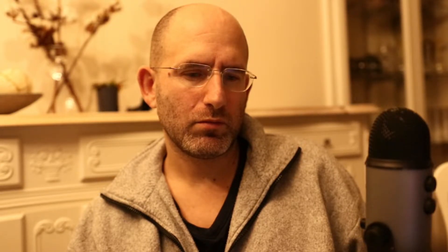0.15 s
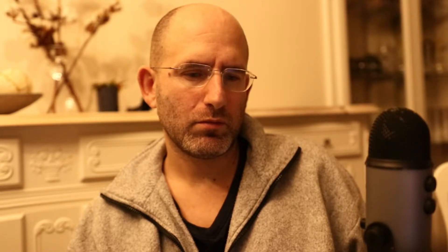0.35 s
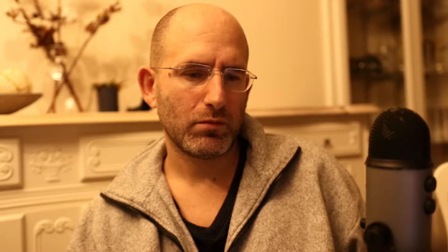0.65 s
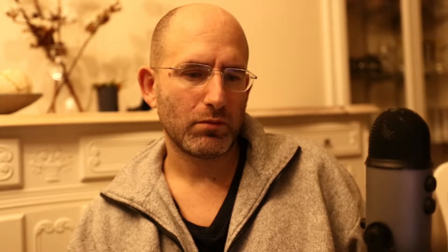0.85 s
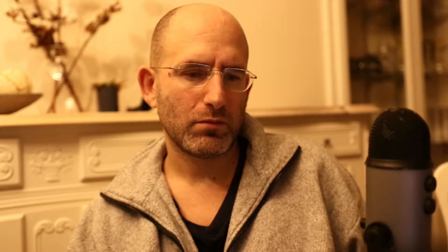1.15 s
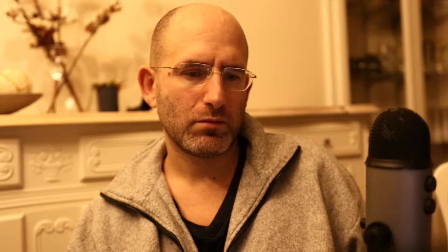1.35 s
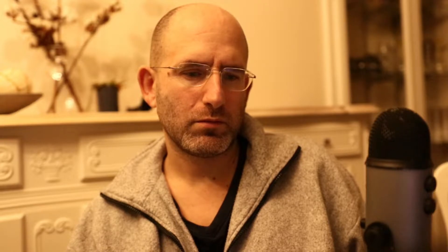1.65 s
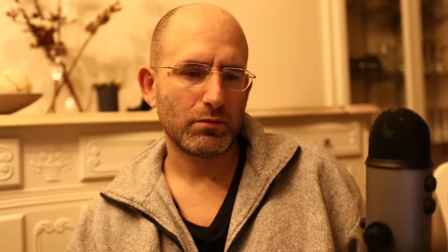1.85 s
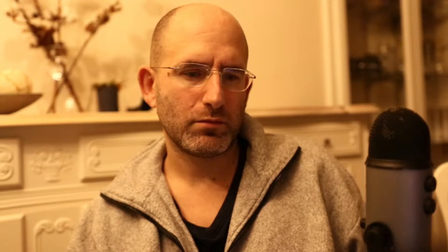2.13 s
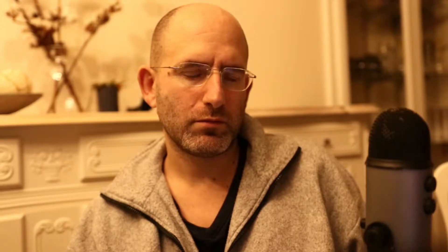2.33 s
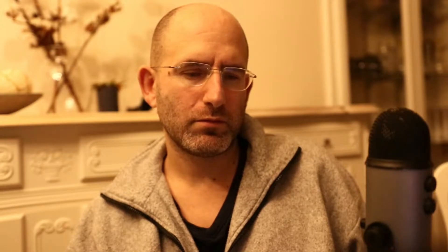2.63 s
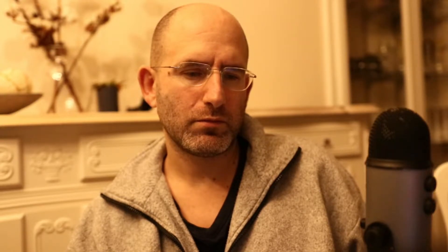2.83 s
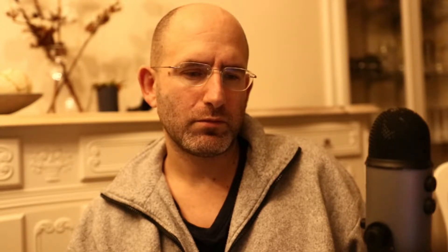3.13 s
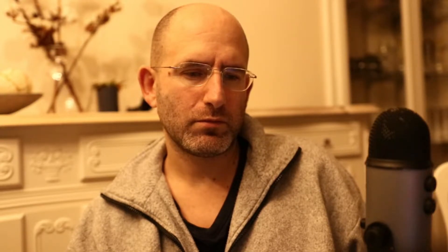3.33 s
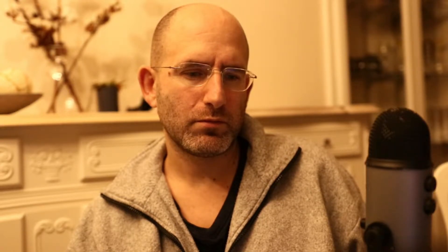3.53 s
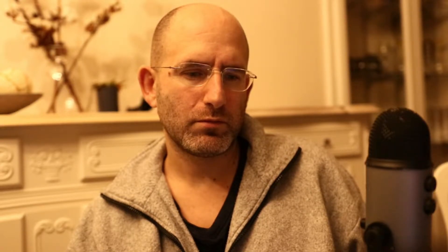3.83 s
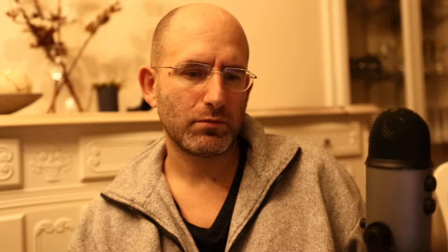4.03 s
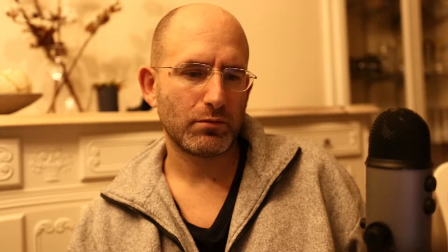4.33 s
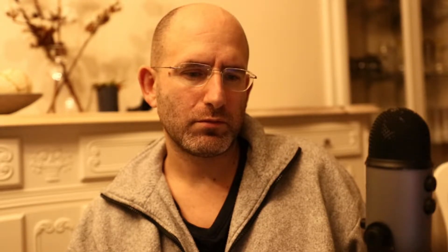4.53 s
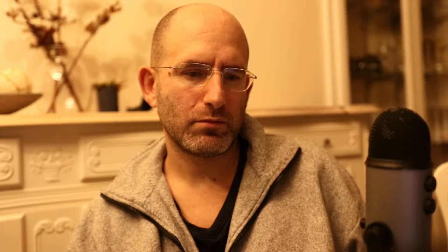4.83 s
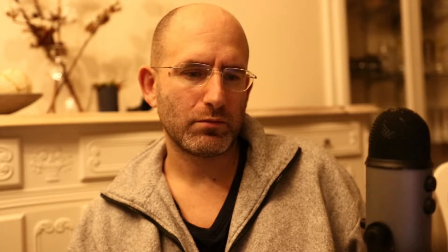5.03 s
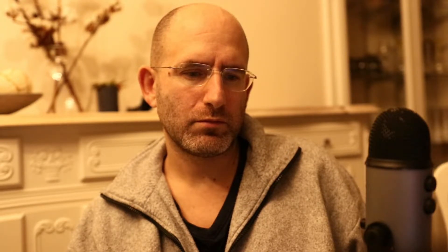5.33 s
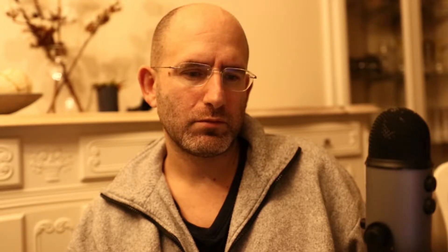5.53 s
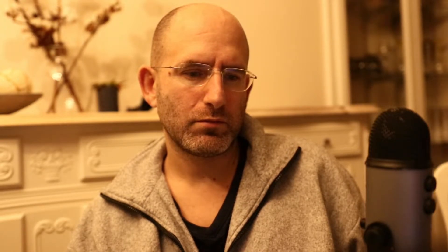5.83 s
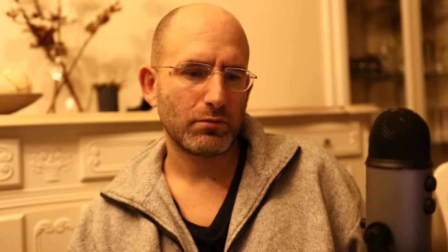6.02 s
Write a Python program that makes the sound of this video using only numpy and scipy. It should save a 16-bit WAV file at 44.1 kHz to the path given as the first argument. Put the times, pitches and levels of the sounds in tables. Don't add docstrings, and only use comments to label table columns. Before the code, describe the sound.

A small motor hums low and steady under soft airy hiss in a quiet furnished room, with one light hollow knock near the start.

```python
import sys
import numpy as np
from scipy import signal
from scipy.fft import rfft, irfft, next_fast_len
from scipy.io import wavfile
from scipy.ndimage import uniform_filter1d

SR = 44100
rng = np.random.default_rng(int(sys.argv[2]) if len(sys.argv) > 2 else 0)


def transcribe(u):
    v = np.clip(np.atleast_2d(u).T, -1, 1)
    q = np.round(v * 32767).astype(np.int16)
    wavfile.write(sys.argv[1], SR, q)


def nominal_scale(level):
    x = np.asarray(level, float) / 20
    return 10 ** x


N = 272273

# f/Hz, level/dB
WHINES = [(4097, -92), (6002, -93), (6449, -94), (6735, -96), (10002, -99)]
# f/Hz, left density/(dB per Hz), right density/(dB per Hz)
RUMBLE = [(12.0, -79, -85), (35.4, -87, -84), (65.0, -82.5, -80.5), (76, -76, -79), (91, -85, -77),
          (137, -83.5, -84.5), (208, -87, -79), (230.8, -72, -85), (238, -64, -84), (269, -81, -89.5),
          (316, -83, -94.5), (355, -85.5, -90.5), (388, -90.5, -88), (500.0, -91.5, -92)]
# f/Hz, share/(0-1), left lead/rad
RUMBLE_PAIR = [(30, 0.77, 1.5), (111, 0.66, 2.47), (173, 0.55, 0.6), (238, 0.82, -1.5), (297, 0.75, 1.6),
               (500, 0.33, -0.75)]
# f/Hz, left density/(dB per Hz), right density/(dB per Hz)
HISS = [(505, -93.5, -94.5), (810, -94, -95.5), (1160, -94.5, -96), (1280, -91.5, -95.5),
        (1800, -94, -93.5), (2120, -96, -99), (2520, -93, -95), (2815, -96, -97.5), (3490, -103.5, -102.5),
        (4030, -101.8, -103.6), (5000, -106.5, -105.6), (7400.0, -107.6, -109.0), (8400, -111.2, -111.3),
        (15100, -114.1, -114.0)]
# f/Hz, share/(0-1)
THROUGH_ROOM = [(500, 0.56), (900, 0.97), (3500, 0.55), (6000, 0.66), (8800, 0.4)]
# f/Hz, width/Hz, lift/dB
HOUSING = [(10.6, 8.1, 4.5), (75, 7.8, 2.5), (169.7, 12, 6), (758, 35, 3), (904, 215, 4.5), (1037, 64, 1.5),
           (2290, 115, 2.5), (3300, 123, 5.5), (4020, 260, 3)]
# f/Hz, level/dB, t60/s
FIZZ = [(6630, -6, 0.01), (7000, 2.5, 0.009), (7420, 1.5, 0.016), (7900, -14, 0.012), (4150, 1.5, 0.0086),
        (11100, -16, .004)]
# t/s, peak/dB, ring f/Hz
SPARKS = [(0.3107, -63, 7000), (0.8909, -65, 7400), (1.3104, -70, 7750), (1.5509, -68, 7410),
          (1.9714, -65, 7420), (2.4104, -62, 6930), (2.7102, -64, 6970), (3.25, -68, 6650),
          (3.6706, -66, 7930), (3.7905, -67, 7000), (3.93, -65, 7380), (4.4692, -68, 7450),
          (4.9092, -64, 7440), (5.8686, -70, 7340)]
# f/Hz, left/dB, right/dB, t60/s
KNOCK_BODY = [(300, -50, -45, 0.022), (395, -47, -44, 0.024), (570, -40.5, -40, 0.026),
              (665, -55, -56, .035)]
# f/Hz, left/dB, right/dB, t60/s
KNOCK_TICK = [(940, -47, -46, 0.012), (1660, -47, -45, .008), (2350, -53, -53, .006),
              (3100, -47.5, -45.5, 0.0093), (7000, -56, -57, 0.0073)]
# shaft order, left/dB, right/dB, left lead/rad
ORDERS = [(1, -57.6, -67.5, 1.6), (2, -71.1, -69.9, 2.2), (3, -68.1, -71.1, -0.6), (4, -42.9, -53.4, -0.6),
          (5, -52.0, -55.8, -2.7), (6, -65.1, -78.8, 0.2), (12, -79.2, -83.8, 0.8),
          (13, -79.0, -77.2, -0.3), (16, -73.7, -72.7, 0.0), (17, -81.8, -81.3, 1.0),
          (18, -83.1, -87.7, -0.6)]

SHAFT_HZ = 56.7475
JOINT_HZ = 8950
EDGE_HZ = 15750
MAINS_HZ, MAINS_START_S = 50.02, 0.0107
SPARK_PAN_DB = 1.8
KNOCK_S, KNOCK_LAG_S = 0.33105, 0.0005
SECOND_HZ, SECOND_START_S, SECOND_RISE_S = 332.55, 2.73, 0.3
SECOND_DB = [[-61.5], [-64.5]]
SWAY_DB, SWAY_PERIOD_S, SWAY_LEFT_S = 2.5, 2.9, 4.65


def read(points, at_hz, column):
    table = np.array(points, float)
    return np.interp(np.log1p(at_hz), np.log1p(table[:, 0]), table[:, column])


def both(points, at_hz):
    return nominal_scale(np.array([read(points, at_hz, 1), read(points, at_hz, 2)]))


def drift(top_hz):
    t = np.arange(0, N + 64, 64) / SR
    rates_hz = np.geomspace(0.2, top_hz, num=12)
    x = sum(np.sin(2 * np.pi * (f * t + rng.random())) / np.sqrt(f) for f in rates_hz)
    return np.interp(np.arange(N) / SR, t, x / x.std())


def ring(hz, t60_s):
    t = np.arange(4096) / SR
    return np.sin(2 * np.pi * hz * t) * 1000.0 ** (-t / t60_s)


def room(t60_s, direct):
    t = np.arange(SR // 2) / SR
    tail = rng.standard_normal((2, len(t))) * 1000.0 ** (-t / t60_s)
    tail /= np.linalg.norm(tail, axis=1, keepdims=True)
    tail[:, 0] += direct
    return tail / np.linalg.norm(tail, axis=1, keepdims=True)


def whines():
    t = np.arange(N) / SR
    out = np.zeros((2, N))
    for hz, db in WHINES:
        offset_turns = 0.2 * rng.random((2, 1)) * (hz < JOINT_HZ)
        out += nominal_scale(db - 0.5) * np.sqrt(2) * np.cos(2 * np.pi * (hz * t + offset_turns))
    return out


def air():
    size = next_fast_len(N, real=True)
    hz = np.fft.rfftfreq(size, 1 / SR)
    white = rfft(rng.standard_normal((3, size))) * np.sqrt(SR / 2)
    low = hz < HISS[0][0]
    lead = np.exp(1j * np.array([read(RUMBLE_PAIR, hz, 2), 0 * hz]))
    comb = rfft(room(t60_s=0.21, direct=0.61), size)
    comb /= np.sqrt(uniform_filter1d(abs(comb) ** 2, size=900))
    path = np.where(low, lead, comb)
    share = np.where(low, read(RUMBLE_PAIR, hz, 1), read(THROUGH_ROOM, hz, 1))
    share = np.clip(share, 0, 1)
    pair = share * path * white[0] + np.sqrt(1 - share ** 2) * white[1:]
    pair = np.where(hz > JOINT_HZ, white[0], pair)
    colour = np.where(low, both(RUMBLE, hz), both(HISS, hz))
    lift_db = sum(db / (1 + (2 * (hz - f) / width) ** 2) for f, width, db in HOUSING)
    noise = irfft(pair * colour * nominal_scale(lift_db), size)[:, :N]
    return nominal_scale(-0.3 + 0.3 * drift(17.0)) * noise


def contact():
    at_s = np.arange(MAINS_START_S, N / SR, 1 / MAINS_HZ)
    draw = rng.random((len(at_s), len(FIZZ) + 1))
    size = nominal_scale(-79.5 - 4.4 * np.log(draw[:, 0]).clip(-2.5))
    out = np.zeros((2, N + 4096))
    for k, (hz, db, t60_s) in enumerate(FIZZ):
        train = np.zeros(N)
        late_s = 0.00012 * rng.random(len(at_s))
        train[((at_s + late_s) * SR).astype(int)] = size * (0.28 + 1.64 * draw[:, k + 1])
        fizz = signal.oaconvolve(train, ring(hz, t60_s))[:N]
        out[:, :N] += nominal_scale(db) * fizz * nominal_scale([[2.5], [-1.5]])
    pan = nominal_scale(np.array([[1], [-1]]) * SPARK_PAN_DB / 2)
    for start_s, db, hz in SPARKS:
        spark = ring(hz, 0.015) + 0.74 * ring(FIZZ[0][0], 0.015) + 0.49 * ring(FIZZ[2][0], 0.012)
        out[:, round(start_s * SR):][:, :4096] += nominal_scale(db + 2.0) * spark * pan
    return signal.fftconvolve(out, room(t60_s=0.037, direct=1.5), axes=1)[:, :N]


def struck(modes):
    return sum(nominal_scale([[left_db], [right_db]]) * ring(hz, t60_s) for hz, left_db, right_db, t60_s in modes)


def knock():
    body = np.roll(struck(KNOCK_BODY), round(KNOCK_LAG_S * SR), axis=1)
    tap = body - struck(KNOCK_TICK)
    tap = signal.fftconvolve(tap, room(t60_s=0.22, direct=5.0), axes=1)
    out = np.zeros((2, N))
    out[:, round(KNOCK_S * SR):][:, :tap.shape[1]] = tap
    return out


def second_machine():
    t = np.arange(N) / SR
    angle = 2 * np.pi * (SECOND_HZ * t + 0.077 * drift(2.5)) + np.array([[1.46], [0]])
    swell = (1 - np.exp(-np.maximum(t - SECOND_START_S, 0) / SECOND_RISE_S)) ** 2
    sway_db = SWAY_DB * np.cos(2 * np.pi * (t - SWAY_LEFT_S) / SWAY_PERIOD_S) * np.array([[1], [-1]])
    return swell * nominal_scale(np.array(SECOND_DB) + sway_db) * np.sqrt(2) * np.cos(angle)


def motor():
    turns = np.arange(N) / SR * SHAFT_HZ + 0.0043 * drift(3.0)
    out = np.zeros((2, N))
    for order, left_db, right_db, lead_rad in ORDERS:
        angle = 2 * np.pi * (order * turns + rng.random()) + np.array([[lead_rad], [0]])
        level_db = np.array([[left_db], [right_db]]) + 0.36 * drift(5.6)
        out += nominal_scale(level_db) * np.sqrt(2) * np.cos(angle)
    return out


def scene():
    return whines() + air() + contact() + knock() + second_machine() + motor()


def roll_off(x):
    return signal.sosfilt(signal.butter(12, 16110, fs=SR, output="sos"), x)


def record(dry):
    edge = signal.firwin(2047, EDGE_HZ, window=("kaiser", 8), fs=SR)
    mix = signal.oaconvolve(dry, edge[None], "same")
    return roll_off(mix)


dry = scene()
out = record(dry)
transcribe(out)
```